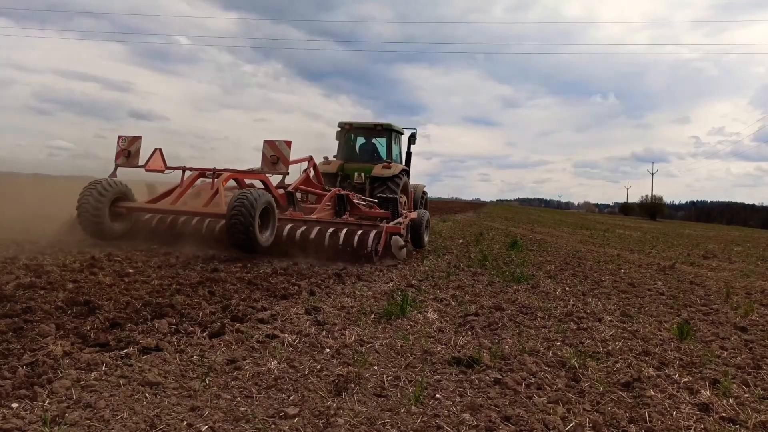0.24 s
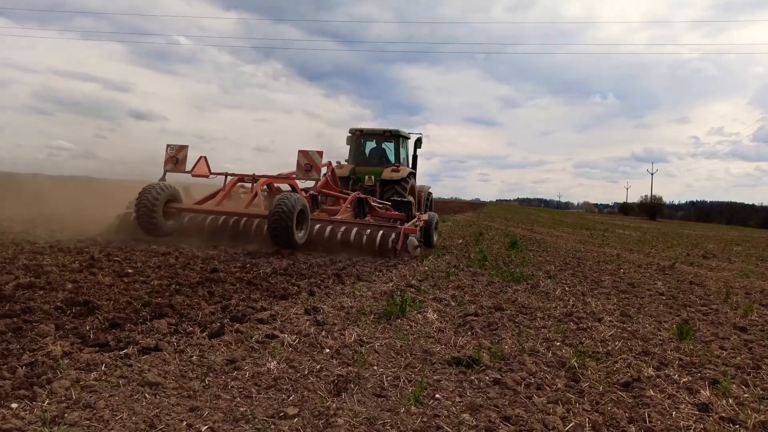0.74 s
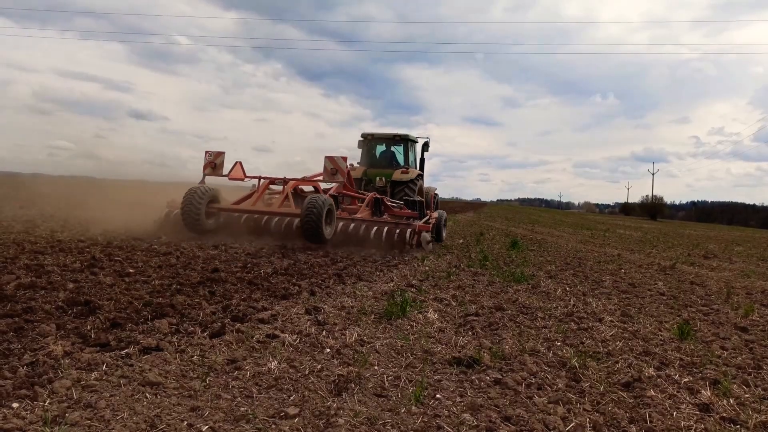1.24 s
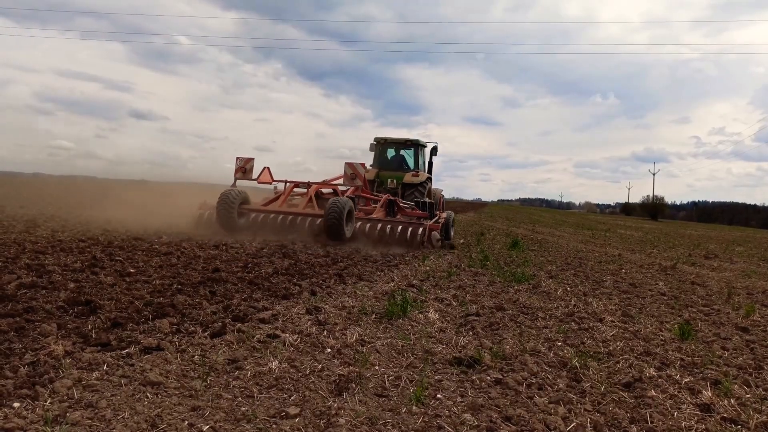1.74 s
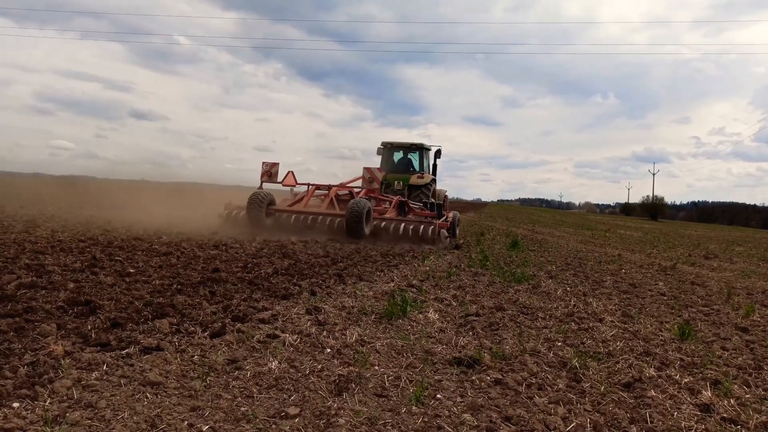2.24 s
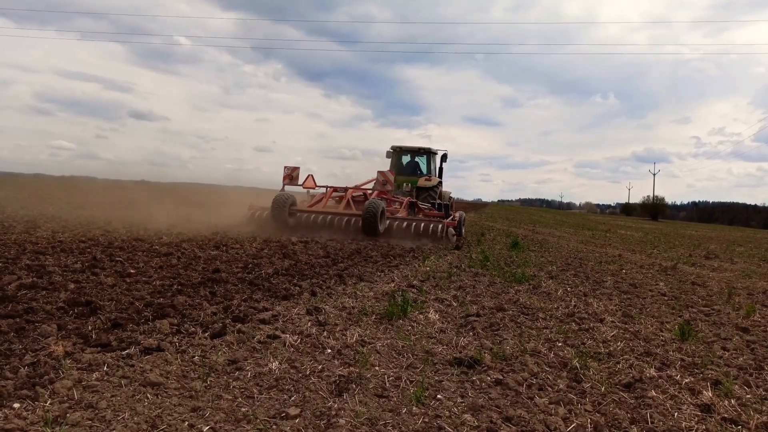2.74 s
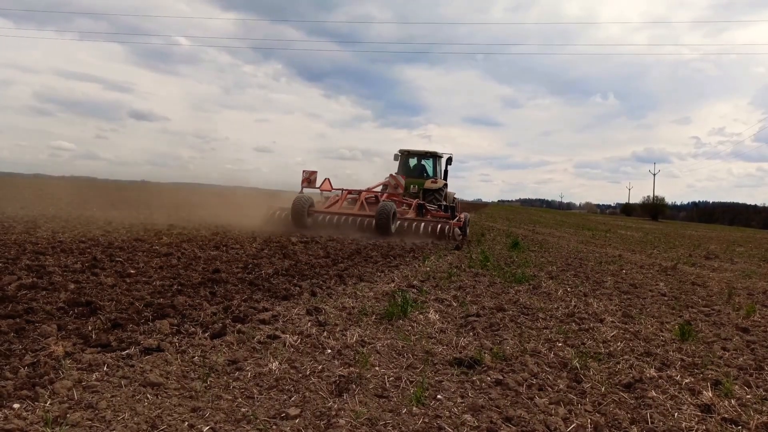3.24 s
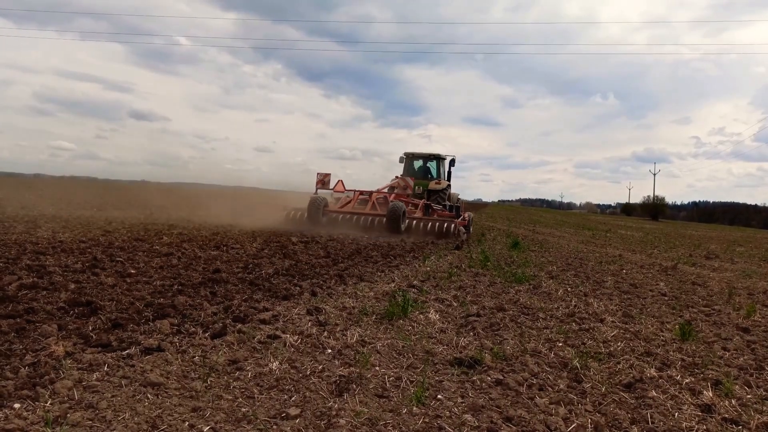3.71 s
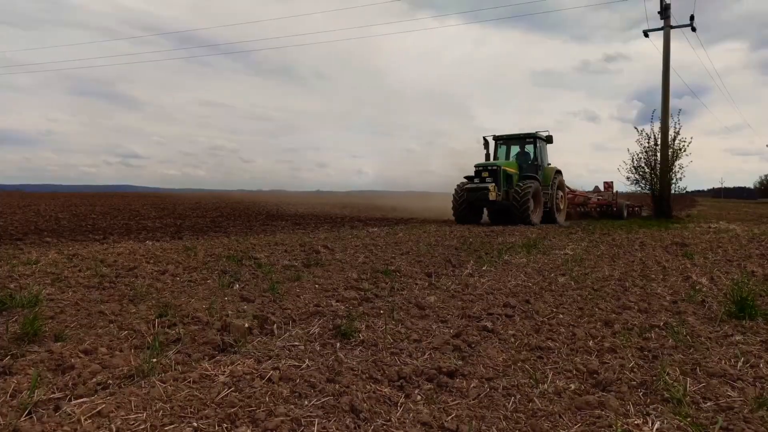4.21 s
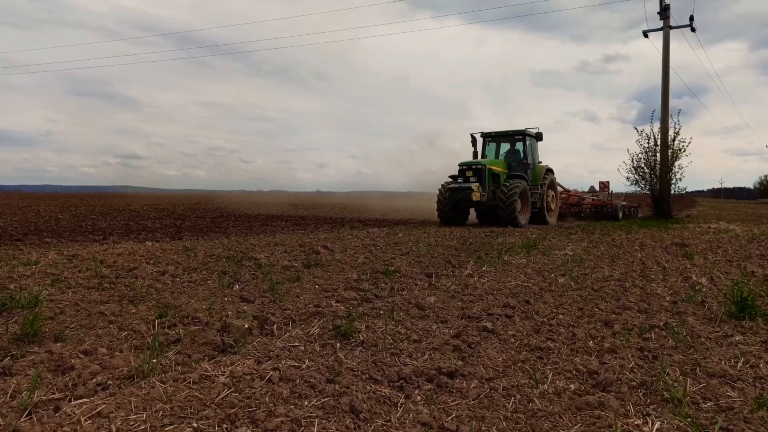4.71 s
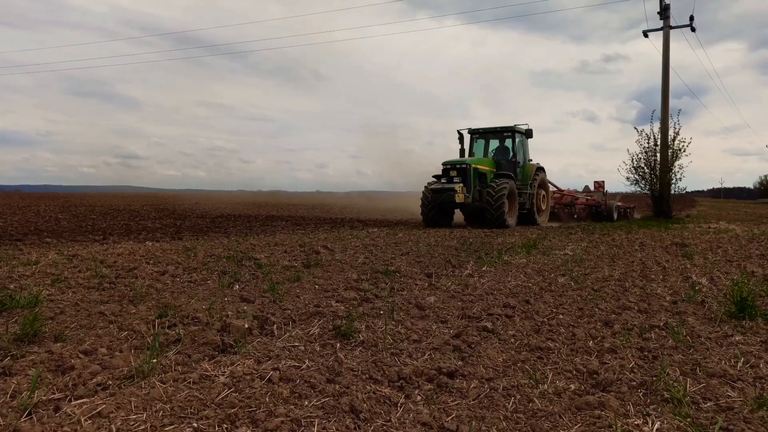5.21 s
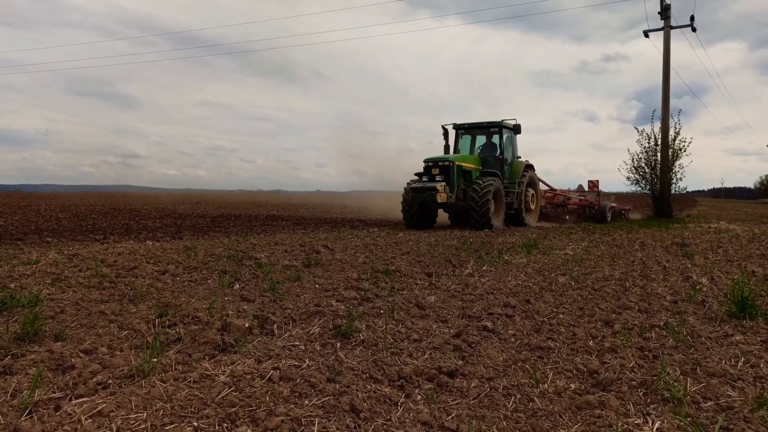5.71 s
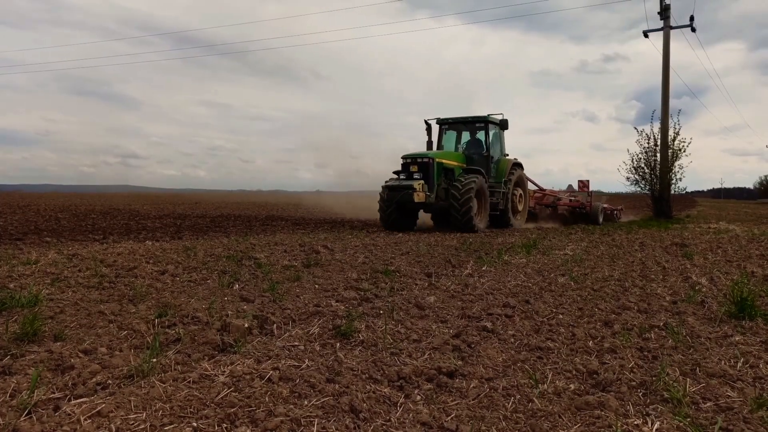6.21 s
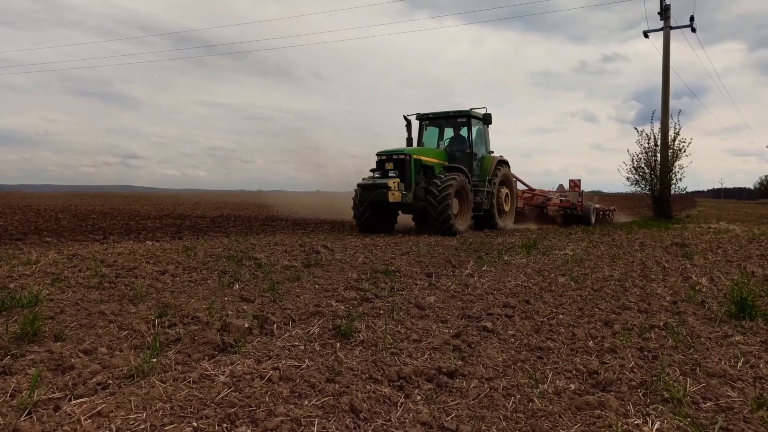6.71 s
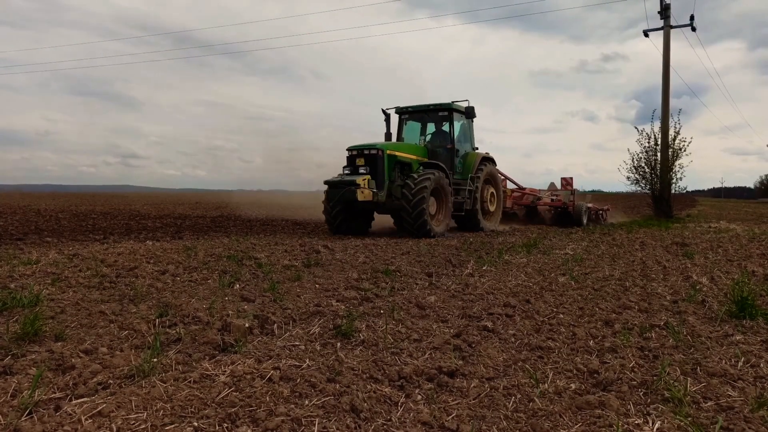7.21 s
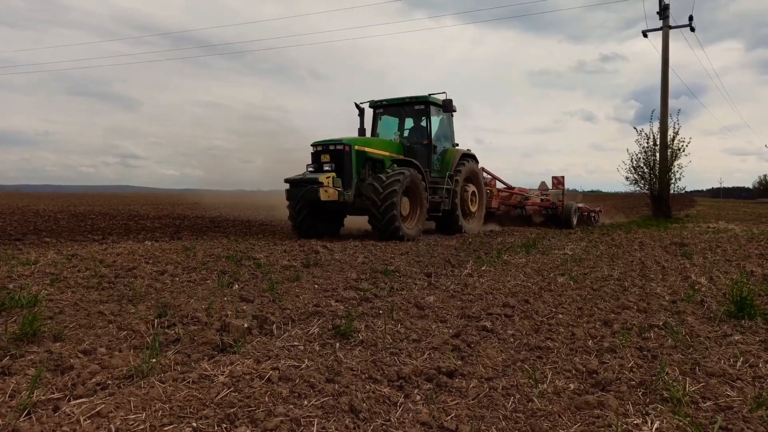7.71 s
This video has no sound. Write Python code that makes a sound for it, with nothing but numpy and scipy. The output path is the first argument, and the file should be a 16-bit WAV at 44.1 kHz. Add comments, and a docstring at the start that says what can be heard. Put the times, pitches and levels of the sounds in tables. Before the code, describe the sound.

Wind buffets the microphone as a tractor pulls a cultivator away, stones clinking; after a brief gap, its diesel engine draws nearer.

```python
"""A dry field, a stereo microphone in the wind. Some 20 m off, a six-cylinder diesel tractor pulls a disc
cultivator away from us: the firings hum, combustion roars, soil sifts off the discs, and stones clink
and squeal on the steel. At 3.8 s, a short silence. Then the tractor fades in from about 57 m and comes
closer, engine first, brighter, with clatter and a thin whistle, crossing slowly from right to left.
In both passes gusts buffet the two microphone ports."""
import sys
import numpy as np
from scipy import signal
from scipy.fft import rfft, irfft
from scipy.io import wavfile
from scipy.ndimage import uniform_filter1d

SR = 44100
rng = np.random.default_rng(int(sys.argv[2]) if len(sys.argv) > 2 else 0)


def file_out(sig):
    """Save sig as 16-bit WAV at sys.argv[1]."""
    # one column per channel
    cols = np.atleast_2d(sig).T
    # limit, then scale
    lim = np.clip(cols, -1, 1)
    pcm = np.round(lim * 32767).astype(np.int16)
    wavfile.write(sys.argv[1], SR, pcm)


N = 350595
TIME = np.arange(N) / SR
CONTACT_TIME = np.arange(-441, 21609) / SR  # seconds around the moment of a contact
AWAY_END_S, RETURN_S, FADE_IN_S = 3.78, 4.01, 0.3
SPEED_M_PER_S, AWAY_FROM_M, NEAR_FROM_M, DISCS_BEHIND_M = 2.75, 20.7, 57, 11.4
FIRINGS_PER_TURN = 3


def amp(db):
    """Decibels to gain."""
    return 10 ** (np.asarray(db) / 20)


def unit(x):
    """Scales to rms 1."""
    return x / np.sqrt(np.mean(x ** 2) + 1e-20)


def pan(side_db):
    """Gains of the two ports for a level of left minus right."""
    return amp(side_db * np.array([[.5], [-.5]]))


def at_hz(points, hz):
    """Reads a spectrum table on a log-frequency axis."""
    f, value = np.transpose(points)
    return np.interp(np.log(hz + 1), np.log(f + 1), value)


def curve(rows, t=TIME):
    """Reads a table of times and values at times t."""
    return np.interp(t, *np.transpose(rows))


def add(mix, start_s, sound):
    """Mixes a stereo sound in."""
    part = mix[:, max(round(start_s * SR), 0):][:, :sound.shape[1]]
    part += sound[:, :part.shape[1]]


def drift(rate_hz, count=N):
    """Random wander of rms 1, with changes up to the given rate."""
    hz = np.fft.rfftfreq(count, 1 / SR)
    return unit(irfft(rfft(rng.standard_normal(count)) / (1 + (hz / rate_hz) ** 4), count))


def spreading_db(from_m, travelled_m):
    """Sound pressure falls as one over the distance; 0 dB at the starting point."""
    return -20 * np.log10(np.maximum(from_m + travelled_m, 1) / from_m)


def port_noise(spectrum, count, stretch=1):
    """Turbulence right at the microphone, unrelated at the two ports."""
    hz = np.fft.rfftfreq(count, 1 / SR)
    colour = amp(at_hz(spectrum, hz / stretch))
    return unit(irfft(rfft(rng.standard_normal((2, count))) * colour, count))


# Wind on the microphone. Each row: frequency in Hz, relative level in dB.
WIND_SPECTRUM = [(15, -29), (45, -41.5), (65, -10), (90, -4.5), (140, -2.5), (210, -6.5), (300, -23),
                 (450, -28), (900, -44), (3000, -80)]
def breeze(left_db, right_db, gusty_db):
    """Lumpy low rumble of air over each port."""
    rumble = port_noise(WIND_SPECTRUM, N)
    gusts = unit(amp(gusty_db * np.array([drift(25), drift(42)])))
    return amp([[left_db], [right_db]]) * rumble * gusts


# One eddy on the microphone. Each row: frequency in Hz, relative level in dB.
EDDY_SPECTRUM = [(30, -39.5), (65, -22.5), (110, 10), (220, 3), (340, 0.5), (600, -13.5), (1000, -29.5),
                 (2000, -50.5), (6000, -73.5)]
# Each row: start and length in seconds, level in dB, left minus right in dB, factor on frequency.
EDDIES = [(0.541, 0.11, -18.5, 3, 0.8), (0.857, 0.04, -18.5, -11, 1), (1.049, 0.048, -19.5, 13, 1.2),
          (1.306, 0.16, -19.5, -18, 0.97), (1.922, 0.13, -22, -17, 0.85), (2.496, 0.073, -17, 17, 1.1),
          (2.576, 0.093, -17, 21, 1.48), (2.756, 0.19, -20, 19, 1.11), (2.952, 0.046, -17.5, -1, 0.71),
          (3.073, 0.2, -20.5, 0, 0.75), (3.237, 0.034, -21, 10, 1), (3.344, 0.069, -17, -20, 0.83),
          (4.499, 0.14, -23.5, -11, 0.75), (7.318, 0.064, -17.5, -17, 0.94), (7.581, 0.058, -20, -8, 1.9),
          (7.657, 0.13, -22.5, -1, 1.1), (7.86, 0.096, -17, -12, 1.1)]
def buffets():
    """Single eddies, 0.186 s long at most, thump the ports, mostly one more than the other."""
    out = np.zeros((2, N))
    for start, length, db, side_db, bright in EDDIES:
        eddy = port_noise(EDDY_SPECTRUM, count=8192, stretch=bright)[:, :round(length * SR)]
        eddy = np.array([unit(port * signal.windows.tukey(len(port), .5)) for port in eddy])
        add(out, start, amp(db) * unit(pan(side_db)) * eddy)
    return out


# Knocks and pops. Each row: start in seconds, peak in dB, pitch in Hz, t60 in seconds,
# left minus right in dB.
DULL_KNOCKS = [(1.1905, -16.5, 840, 0.017, -1), (1.79, -9, 547, 0.009, -24), (3.59, -20.5, 950, 0.01098, 0)]
def knocks(rise_s):
    """Dull blows that die within a few swings."""
    out, t = np.zeros((2, N)), np.maximum(CONTACT_TIME, 0)
    for start, db, hz, t60, side_db in DULL_KNOCKS:
        blow = np.sin(2 * np.pi * hz * t) * (1 - np.exp(-t / rise_s)) * amp(-60 * t / t60)
        add(out, start + CONTACT_TIME[0], amp(db) * unit(pan(side_db)) * blow / abs(blow).max())
    return out


# How alike the two ports hear the field. Each row: frequency in Hz, likeness from 0 to 1.
PORT_LIKENESS = [(100, 0.93), (900, 0.98), (2000, 0.77), (3000, 0.75), (5000, 0.39), (8000, 0.83),
                 (12000, 0.12)]
# Each row: frequency in Hz, left port minus right port in dB.
PORT_TILT = [(200, -2), (1000, -0.5), (3000, -2.5), (4500, 3), (6000, -1), (7700, 4), (9000, 0),
             (14000, -2)]
# The tractor's bearing. Each row: time in seconds, lead of the right port in milliseconds.
RIGHT_LEAD = [(0, 0.027), (3.8, 0.044), (4.1, 0.09), (5, 0.079), (6, 0.05), (7, 0.024), (7.95, -0.035)]
def field_noise(spectrum, patchy_db):
    """Patchy noise from the tractor's direction, as the two ports receive it."""
    hz, t, bands = signal.stft(rng.standard_normal((2, N)), SR, nperseg=1024)
    alike = at_hz(PORT_LIKENESS, hz)[:, None]
    lead = np.exp(2j * np.pi * hz[:, None] * curve(RIGHT_LEAD, t) / 1000)
    bands[1] = (alike * bands[0] + np.sqrt(1 - alike ** 2) * bands[1]) * lead
    colour = amp(at_hz(spectrum, hz)) * pan(at_hz(PORT_TILT, hz))
    patches = uniform_filter1d(rng.standard_normal(bands.shape[1:]), size=10, axis=0)
    patches = unit(uniform_filter1d(patches, size=4, axis=1))
    bands *= colour[:, :, None] * amp(patchy_db * patches)
    return unit(signal.istft(bands, SR)[1][:, :N])


# Bright hiss of sifting soil, from behind and from the front, strongest below 8.5 kHz.
# Each row: frequency in Hz, relative level in dB.
SOIL_BEHIND = [(800, -20), (2000, 4), (2600, 3.5), (2900, -1.5), (3150, 1), (3800, 4), (4650, 1),
               (4850, -3), (6000, -1.5), (6250, 3.5), (7250, 2.5), (7600, 5), (7750, 2.5), (8400, -1.5),
               (8600, -13), (9300, -21.5), (10300, -48.5), (12000, -9), (15000, -18)]
SOIL_FRONT = [(800, -12), (2000, -21), (3100, -1), (4050, 6), (4700, 7), (4850, -1.5), (5400, -0.5),
              (6050, 1), (6200, 6.5), (6850, 8.5), (7100, 3), (7600, 10.5), (7720, 2), (8420, 5.5),
              (8600, -11.5), (9300, -10), (10300, -45), (12100, -4.5), (15000, -24.5)]
def soil(spectrum, crumble, clump):
    """Dry earth sifts off the discs in clumps of tiny grains."""
    return field_noise(spectrum, patchy_db=2.5) * unit(np.exp(crumble * drift(540) + clump * drift(31)))


# Soil thrown by the approaching discs. Each row: middle in seconds, gain in dB, half length in seconds.
SOIL_SURGES = [(4.627, 3, 0.041), (5.028, 1.5, 0.07), (5.3, 2, 0.023), (5.63, 4, 0.025), (5.92, 3, 0.23),
               (6.432, 5, 0.087), (6.87, 2.5, 0.057), (7.061, -5, 0.056), (7.27, 1.5, 0.061),
               (7.594, 3.5, 0.087), (7.886, 2.5, .05)]
def approaching_soil(crank, start_db):
    """Soil surges beyond the tractor; the engine's hiss mingles with it and pulses with the firing."""
    surge_db = sum(db * np.exp(-((TIME - middle) / half) ** 2) for middle, db, half in SOIL_SURGES)
    nearing_db = spreading_db(NEAR_FROM_M + DISCS_BEHIND_M, -SPEED_M_PER_S * (TIME - RETURN_S))
    pulse = 1 + 0.22 * np.sin(FIRINGS_PER_TURN * crank - 2 * np.pi * .1)  # a tenth of a firing late
    return amp(start_db + nearing_db + surge_db) * soil(SOIL_FRONT, crumble=0.095, clump=0.075) * pulse


# Modes of a steel disc. Each row: frequency in Hz, relative level in dB, t60 in seconds.
DISC_MODES = [(2050, -11, .07), (2350, -10, .05), (2630, -7, .11), (3110, -6, .23), (3526, -9, .07),
              (3885, -5, .09), (4150, -5, .09), (4480, -4, .08), (4730, -10, .1), (5010, -11, .09),
              (5480, -12, .08), (6525, -8, .1), (6821, -9, .06), (7450, -9, .07)]
def disc_ring(force, centre_hz, narrow_db, ring_db, favoured_hz):
    """A disc cracks and rings; the stone's size picks the band, its place favours one mode."""
    t = np.arange(force.shape[1]) / SR
    hz, db, t60 = np.transpose(DISC_MODES)[:, :, None]
    # no two discs ring quite alike: all modes shift with the favoured one
    hz = hz * favoured_hz / hz[np.argmin(abs(hz - favoured_hz))]
    db = db + 8 * np.exp(-(np.log2(hz / favoured_hz) / .07) ** 2)
    modes = amp(db - 60 * t / t60) * np.sin(2 * np.pi * hz * t)
    at_ports = rng.uniform(0.94, 0.98, (2, len(DISC_MODES))) @ modes
    ring = signal.fftconvolve(force, at_ports, axes=1)[:, :len(t)]
    bins = np.fft.rfftfreq(len(t), 1 / SR)
    crack = irfft(rfft(force) * amp(at_hz(SOIL_BEHIND, bins)), len(t))
    band = amp(-abs(narrow_db) * np.log2((bins + 1) / centre_hz) ** 2)
    return irfft(rfft(unit(crack) + amp(ring_db) * unit(ring)) * band, len(t))


def grit(count):
    """Gritty contact force, half of it common to both ports."""
    return rng.standard_normal(count) + rng.standard_normal((2, count))


# Stones dragged along the departing discs. Each row: start and length in seconds, relative level in dB,
# squeal pitch in Hz, its share from 0 to 1, its overtones in dB, centre of the grinding in Hz,
# loss an octave off centre in dB (sign ignored), ring over grinding in dB.
DRAGGED_STONES = [(0.219, .14, -44, 1395, 1, -20, 1500, 20, -11),
                  (1.353, 0.012, -33, 4340, 0.4, -20, 4700, 8, -7),
                  (1.566, .045, -38.5, 2590, 0.96, -22, 2580, 23, -10.5),
                  (1.675, 0.038, -29.5, 2177, 0.93, 0, 3006, -4, -15),
                  (1.699, 0.033, -29, 2340, 0.24, -12, 5300, 4, -6),
                  (2.091, .04, -42, 4380, 0.4, -20, 4200, 22, -11.5),
                  (2.109, .014, -38.5, 7430, .8, -20, 7000, 10.5, -11),
                  (3.263, 0.031, -43, 3880, .65, -10, 3895, 27, -13),
                  (3.41, 0.032, -39, 1768, 0.6, -10, 1800, 23, -17)]
def scrapes(gain_db, wobble, sag_per_s):
    """A trapped stone grinds along a disc, and sticks and slips into a slightly falling squeal."""
    out, t = np.zeros((2, N)), CONTACT_TIME
    for start, length, db, hz, share, overtone_db, centre_hz, narrow_db, ring_db in DRAGGED_STONES:
        press = np.interp(t, [0, .001, length, length + .008], [0, 1, .8, 0])
        force = grit(len(t)) * press * np.exp(0.25 * drift(300, len(t)))
        grind = unit(disc_ring(force, centre_hz, narrow_db, ring_db, hz))
        phase = 2 * np.pi * np.cumsum(hz * (1 - sag_per_s * t + wobble * drift(640, len(t)))) / SR
        # the overtones take on the colour of all that the discs radiate
        tone = sum(amp(at_hz(SOIL_BEHIND, k * hz) + (k > 1) * overtone_db) * np.sin(k * phase) / k
                   for k in range(1, 4))
        squeal = unit(press * tone * (1 + 0.36 * drift(150, len(t))))
        scrape = np.sqrt(1 - share) * grind + np.sqrt(share) * squeal
        add(out, start + t[0], amp(db + gain_db) * np.sqrt(length / t[-1]) * scrape)
    return out


# Stones striking the discs, most of them 9 to 18 m off. Each row: start in seconds, relative peak in dB,
# contact time in seconds, centre of the clink in Hz, loss an octave off centre in dB,
# ring over click in dB, favoured mode in Hz, left minus right in dB.
STONE_HITS = [(0.0157, -16, .008, 4700, 9, -6.5, 4480, 12.5), (0.0497, -19, 0.0073, 4300, 11, 0, 4440, 7),
              (.1444, -29.5, .01, 2100, 11, 1, 2060, 13), (0.308, -20, 0.0087, 5800, 4, -4, 6550, 4),
              (0.435, -21, 0.012, 2700, 12.5, 5, 2620, -0.5), (.4994, -28, 0.0088, 4150, 26, 2, 4150, 0),
              (0.6153, -25, 0.013, 3300, 13, 1, 3850, -2),
              (0.863, -13.5, 0.0049, 2900, 5.5, -0.5, 2380, -0.5),
              (0.951, -18, 0.0086, 3000, 4.5, -2.5, 4130, -1.5),
              (1.232, -24.5, 0.0087, 5960, 7.5, -1.5, 6525, -0.5),
              (1.2514, -21.5, 0.011, 4250, 35, -4, 4480, -2), (1.29, -21.5, 0.0074, 4000, 1, -1, 3526, 0),
              (1.352, -10, .005, 4360, 39, -2, 4450, 0), (1.3568, -14, 0.0079, 2600, 4.5, -2, 2640, -0.5),
              (1.3627, -8.5, .007, 4100, 9.5, -0.5, 3885, 1.5),
              (1.3738, -16.5, .004, 4200, 5, 1.5, 3160, -2.5),
              (1.497, -25.5, 0.0096, 7016, 2, -1, 7450, -2.5),
              (2.1817, -20.5, 0.0054, 3200, 9, -0.5, 2629, 0),
              (2.454, -21, 0.0056, 2869, 14.5, -8, 2350, 2.5),
              (2.502, -22.5, 0.0041, 3700, 3, 12, 2640, -2), (2.994, -21, 0.0063, 3510, 6, -5, 3730, 0.5),
              (3.1517, -24.5, 0.0085, 4200, 10, -4, 3885, 0), (3.1845, -23.5, .006, 3230, 45, -11, 3320, 0),
              (4.995, -18, .008, 5002, 2, -13, 4480, 3), (5.3608, -20, .008, 4503, 26, -7, 4480, 0)]
def stones(gain_db, bite):
    """Stones hit the discs: a sharp first touch, then a few milliseconds of crumbling grit."""
    out, t = np.zeros((2, N)), CONTACT_TIME
    for start, db, contact_s, centre_hz, narrow_db, ring_db, favoured_hz, side_db in STONE_HITS:
        touch = (t >= 0) * (np.exp(-abs(t) / contact_s) + bite * np.exp(-abs(t) / .001))
        clink = disc_ring(grit(len(t)) * touch, centre_hz, narrow_db, ring_db, favoured_hz)
        add(out, start + t[0], amp(db + gain_db) * pan(side_db) * clink / abs(clink).max())
    return out


def whistle(hz, width_hz, flicker_db):
    """A narrow, fluttering band of noise along a pitch curve, from the tractor's direction."""
    lead_s = curve(RIGHT_LEAD) / 1000 * np.array([[0], [1]])
    carrier = np.exp(2j * np.pi * (np.cumsum(hz * np.ones(N)) / SR + hz * lead_s))
    flutter = drift(width_hz) + 1j * drift(width_hz)
    tone = (carrier * flutter / np.sqrt(1 + abs(flutter) ** 2)).real
    return unit(tone * amp(flicker_db * drift(20)))


# The whistle from the front. Each row: time in seconds, level in dB.
WHISTLE_LEVEL = [(4.3, -38.5), (4.65, -36.5), (5.0, -37), (5.7, -37.3), (6.6, -37), (7.0, -39.5),
                 (7.25, -39), (7.4, -46), (7.6, -40.5), (7.95, -42)]
def climbing_whistle(start_hz, climb_hz, wander_hz, settle_s):
    """Perhaps the turbocharger: it wanders at first, then rises a little and steadies."""
    unsettled = np.exp(-np.maximum(TIME - RETURN_S, 0) / settle_s)
    waver_hz = wander_hz * unsettled * drift(39.7) + 16 * drift(11.85)
    hz = start_hz + climb_hz * (1 - unsettled) + waver_hz
    return amp(curve(WHISTLE_LEVEL)) * whistle(hz, width_hz=52, flicker_db=1.7)


def firing_bursts(crank, uneven):
    """A sharp blow at each firing that dies before the next; no two are equally strong."""
    lead, rise, decay = .25, .04, .4  # in firing intervals; the blow leads the exhaust pulse
    firings = FIRINGS_PER_TURN * crank / (2 * np.pi) + lead
    strength = np.exp(uneven * rng.standard_normal(int(firings[-1]) + 1))[firings.astype(int)]
    age = firings % 1
    return strength * np.exp(-age / decay) * (1 - np.exp(-age / rise)) * (1 - age ** 4)


# Metallic clatter from the front. Each row: frequency in Hz, relative level in dB.
CLATTER_SPECTRUM = [(1200, -20), (1750, 1), (1950, 7), (2300, -1.5), (2500, 5), (2750, 2), (2950, 0),
                    (5000, -70)]
# Each row: time in seconds, level in dB.
CLATTER_LEVEL = [(4.25, -31), (4.8, -30.5), (5.4, -29.5), (6.0, -28.5), (6.45, -31), (6.8, -27.5),
                 (7.15, -30.5), (7.31, -25), (7.43, -37), (7.58, -28.5), (7.7, -37), (7.92, -33)]
def clatter(crank, knock, uneven):
    """Each firing rattles the block."""
    metal = field_noise(CLATTER_SPECTRUM, patchy_db=2.0)
    return amp(curve(CLATTER_LEVEL)) * metal * unit(1 + knock * firing_bursts(crank, uneven))


def buzz(crank, spectrum, shift_hz):
    """The part of the roar that repeats every two turns: lines at half orders, in a shifting pattern."""
    mean_turns_per_s = crank[-1] / (2 * np.pi * TIME[-1])
    hz = np.arange(513) / 2 * mean_turns_per_s
    strength = amp(at_hz(spectrum, hz)) * (hz > 550) / (1 + (hz / 2800) ** 4)
    cycles = irfft(strength * np.exp(2j * np.pi * rng.random((4, len(hz)))), 8192)
    blend = np.array([drift(shift_hz) for _ in cycles])
    blend /= np.linalg.norm(blend, axis=0)
    place = crank / (4 * np.pi) % 1
    return unit(sum(share * np.interp(place, np.linspace(0, 1, len(cycle)), cycle)
                    for share, cycle in zip(blend, cycles)))


# The roar from behind and from the front. Each row: frequency in Hz, relative level in dB.
ROAR_BEHIND = [(40, -46.5), (110, 4), (210, 3), (390, 3.5), (560, -2.5), (730, -1), (900, -1), (1150, -8.5),
               (1430, -10.5), (1700, -11.5), (2500, -20), (4500, -21.5), (9000, -64)]
ROAR_FRONT = [(40, -12), (120, 2.5), (260, -2), (390, -1.5), (580, -3), (730, -1), (1150, -4), (1430, -3.5),
              (1700, -8), (2000, -7.5), (2600, -15.5), (3100, -12), (3700, -12), (5000, -20), (10000, -70)]
# Resonances of block and hood. Each row: centre in Hz, width in Hz, lift in dB.
PANEL_MODES = [(377, 25, 2.5), (693, 42, 2.5), (750, 60, 3), (885, 76, 0.5), (1430, 80, 4.5),
               (1860, 140, 1.5), (2440, 100, 7.5), (2685, 89, 10)]
def roar(crank, spectrum, knock, lope, rough, buzz_db):
    """Combustion and gear noise with a buzz; both jump at each firing and lope with the engine cycle."""
    sway = np.cos(crank / 2) + np.cos(3 * crank / 2) / 2
    beat = 1 + knock * firing_bursts(crank, uneven=.35) + lope * sway
    noise = field_noise(spectrum, patchy_db=1.5) * np.exp(rough * drift(60))
    sound = beat * (noise + amp(buzz_db) * buzz(crank, spectrum, shift_hz=1.4))
    hz = np.fft.rfftfreq(N, 1 / SR)
    panels_db = sum(db / (1 + (2 * (hz - centre) / width) ** 2) for centre, width, db in PANEL_MODES)
    return unit(irfft(rfft(sound) * amp(panels_db), N))


# Exhaust lines. Each row: multiple of the crankshaft speed (3 is the firing rate),
# relative level in dB from behind, the same from the front.
EXHAUST_LINES = [(3, -.4, -.4), (3.5, -26, -27), (4, -28, -27), (4.5, -24, -15), (5, -23, -21),
                 (5.5, -15, -23), (7, -24, -29), (7.5, -27, -24), (10, -33, -28), (10.5, -33, -28),
                 (12, -27, -25), (13.5, -26, -24), (14.5, -31, -28), (15, -36, -27), (18, -35, -29)]
def exhaust(crank, firing_hz, from_front, hum_db, octave_db, waver, flutter):
    """Firing pulses give the hum and its octave; unequal cylinders add weak lines, loosely in step."""
    hum = np.zeros(N)
    for order, behind_db, front_db in EXHAUST_LINES:
        weak = order != FIRINGS_PER_TURN
        phase = order * crank + weak * 1.7 * rng.uniform(-0.81, 1)
        unsteady = 1 + (flutter if weak else waver) * drift(9.5)
        hum += amp(front_db if from_front else behind_db) * np.sin(phase) * unsteady
    octave = np.sin(2 * FIRINGS_PER_TURN * crank) * (1 + waver * drift(4.5))
    dip_db = 11 / (1 + ((firing_hz - 93.98) / 2.53) ** 2)  # the octave fades near 94 firings a second
    return -np.sqrt(2) * (amp(hum_db) * hum + amp(octave_db - dip_db) * octave)


def crank_angle(firing_hz):
    """Crankshaft angle in radians: six cylinders fire three times a turn."""
    return 2 * np.pi * np.cumsum(firing_hz) / (FIRINGS_PER_TURN * SR)


# Engine speed going away, sagging and recovering with the load.
# Each row: time in seconds, firings per second.
AWAY_SPEED = [(0.1, 85), (0.31, 92.7), (0.86, 87), (1.2, 88.3), (1.53, 87), (1.73, 92.2), (3.32, 89.7),
              (3.39, 91), (3.76, 85)]
def moving_away():
    """From behind, the cultivator is nearest the microphone and the cab shields the engine."""
    firing_hz, travelled_m = curve(AWAY_SPEED), SPEED_M_PER_S * TIME
    crank = crank_angle(firing_hz)
    engine_db = spreading_db(AWAY_FROM_M, travelled_m)
    discs_db = spreading_db(AWAY_FROM_M - DISCS_BEHIND_M, travelled_m)
    hum = exhaust(crank, firing_hz, from_front=False, hum_db=-18.5, octave_db=-19, waver=.07, flutter=.3)
    combustion = amp(-27) * roar(crank, ROAR_BEHIND, knock=0.31, lope=0.054, rough=0.099, buzz_db=-9.5)
    earth = amp(-36.5 + discs_db) * soil(SOIL_BEHIND, crumble=0.052, clump=0.18)
    turbo = amp(-52) * whistle(hz=4670, width_hz=54, flicker_db=4.0)
    wind = breeze(left_db=-27, right_db=-22.5, gusty_db=4.2)
    return amp(engine_db) * (hum + combustion + turbo) + earth + wind


# Engine speed coming closer. Each row: time in seconds, firings per second.
NEAR_SPEED = [(4.05, 80.9), (4.32, 78.85), (4.55, 80.77), (4.82, 80.6), (5.39, 85.67), (5.9, 92.18),
              (6.43, 92.47), (7.0, 86.25), (7.47, 87.2), (7.74, 83.9), (7.95, 85.25)]
# Swell of hum and roar at the microphone. Each row: time in seconds, gain in dB.
ENGINE_SWELL = [(4.3, -3), (4.9, -1.96), (5.55, 0), (7.28, 0.1), (7.4, -1.5), (7.95, -0.5)]
def coming_closer():
    """From the front the engine is bright and its knock is plain; it crosses from right to left."""
    firing_hz = curve(NEAR_SPEED)
    crank = crank_angle(firing_hz)
    hum = exhaust(crank, firing_hz, from_front=True, hum_db=-14, octave_db=-19, waver=.051, flutter=.23)
    combustion = amp(-21) * roar(crank, ROAR_FRONT, knock=.55, lope=.1, rough=.08, buzz_db=-2)
    earth = approaching_soil(crank, start_db=-31.5)
    rattle = clatter(crank, knock=.9, uneven=.3)
    turbo = climbing_whistle(start_hz=4580, climb_hz=134.8, wander_hz=90.7, settle_s=1.2)
    tractor = amp(curve(ENGINE_SWELL)) * (hum + combustion) + rattle + turbo + earth
    side_db = -1.5 + 0.84 * (TIME - RETURN_S)
    return pan(side_db) * tractor + breeze(left_db=-28, right_db=-23.5, gusty_db=2)


def scene():
    """The two passes, with a short silence between them."""
    fade_out = np.clip((AWAY_END_S - TIME) / 0.0016, 0, 1)
    fade_in = np.clip((TIME - RETURN_S) / FADE_IN_S, 0, 1)
    squeals = scrapes(gain_db=1, wobble=.0025, sag_per_s=.65)
    passes = fade_out * moving_away() + fade_in * coming_closer()
    return passes + buffets() + squeals + knocks(rise_s=.0006) + stones(gain_db=2, bite=0.9)


def record(dry):
    """The recorder's band limit."""
    lowpass = signal.firwin(511, cutoff=15650, window=("kaiser", 9), fs=SR)
    return signal.oaconvolve(dry, lowpass[None], "same")


dry = scene()
out = record(dry)
file_out(out)
```